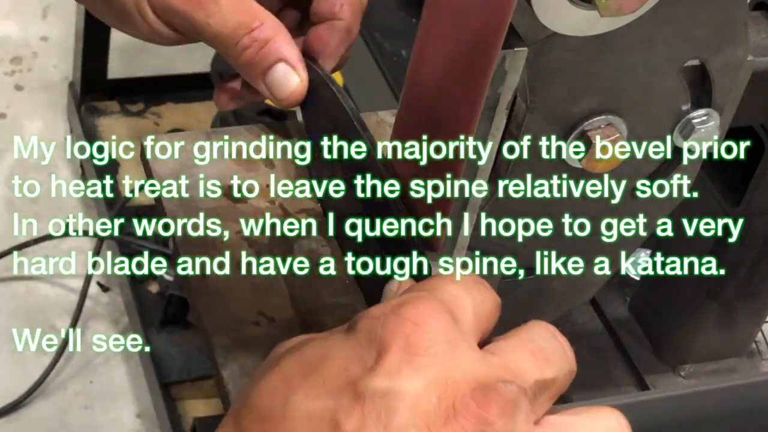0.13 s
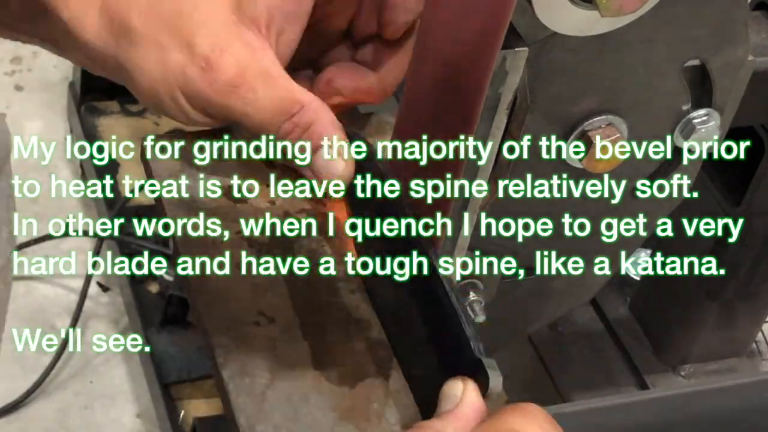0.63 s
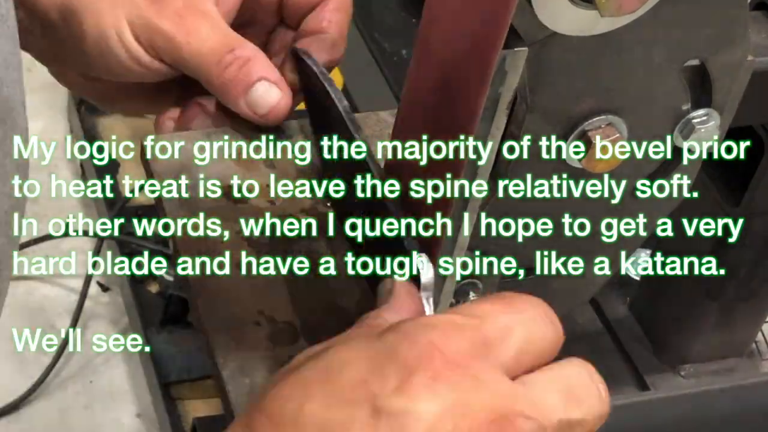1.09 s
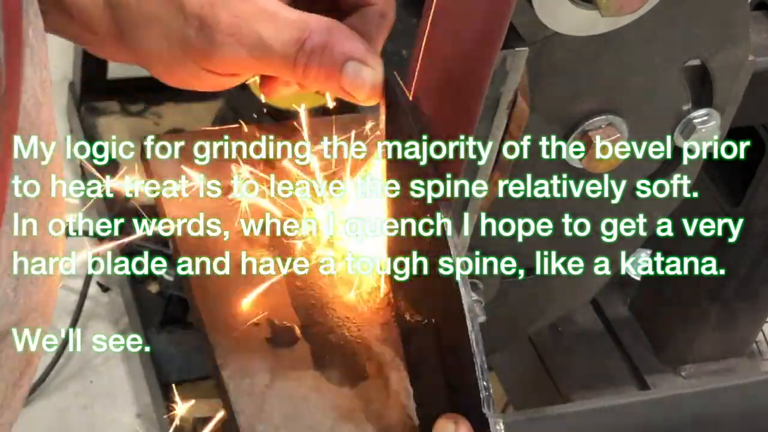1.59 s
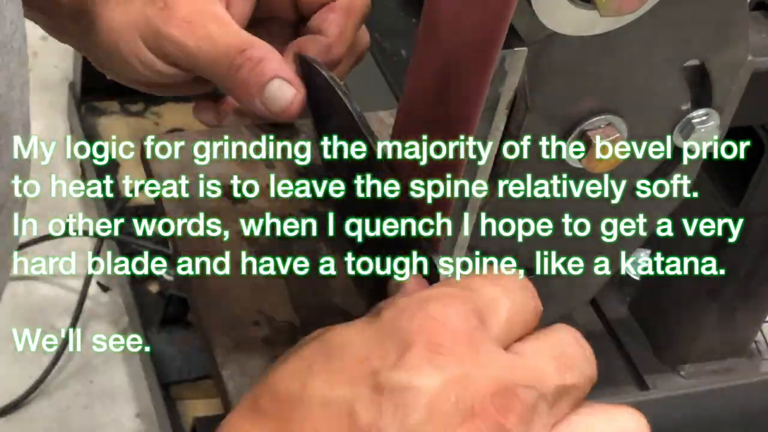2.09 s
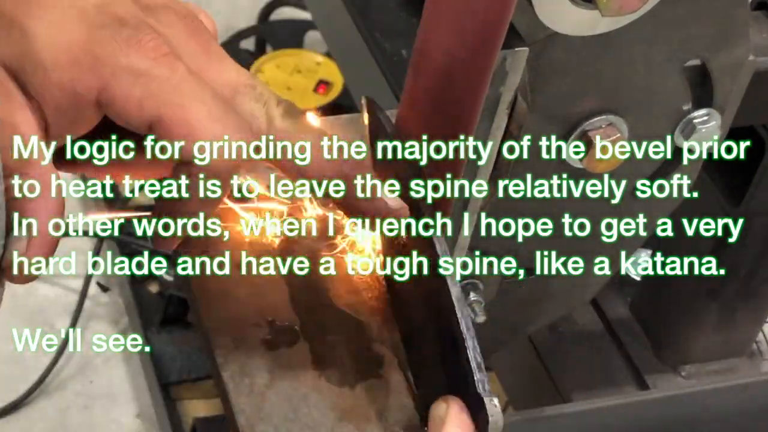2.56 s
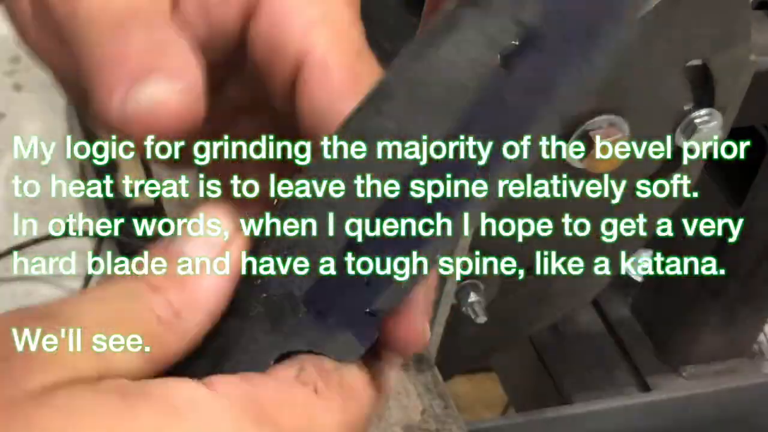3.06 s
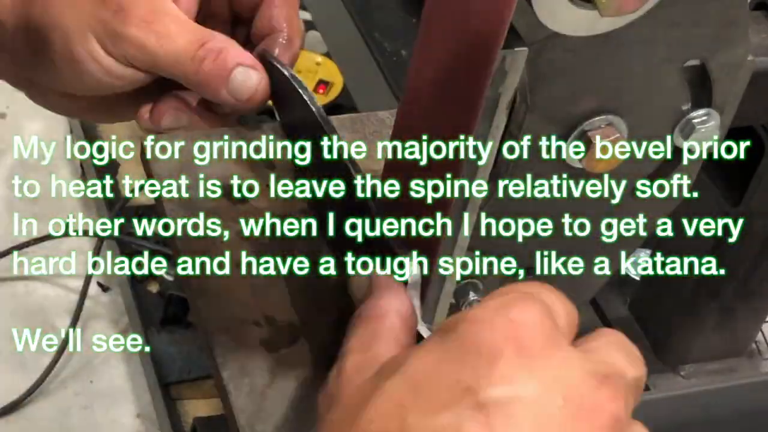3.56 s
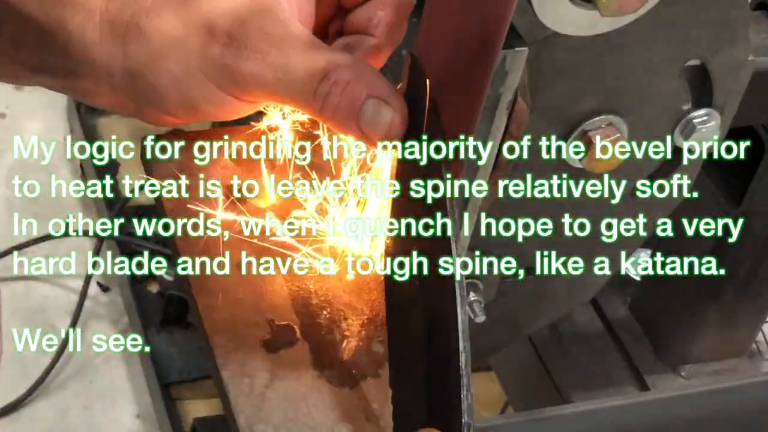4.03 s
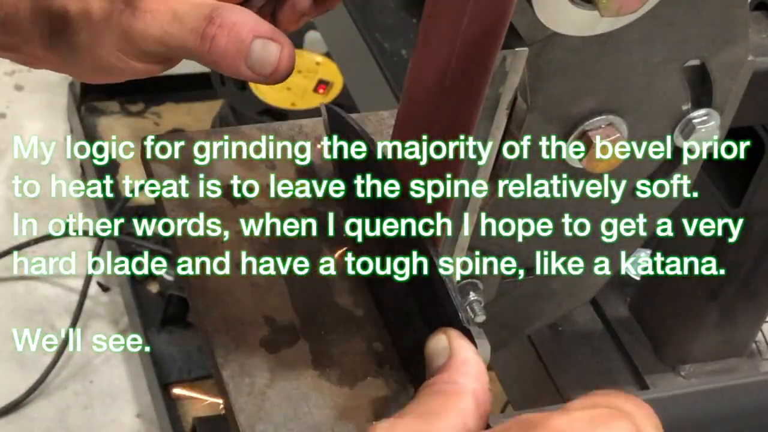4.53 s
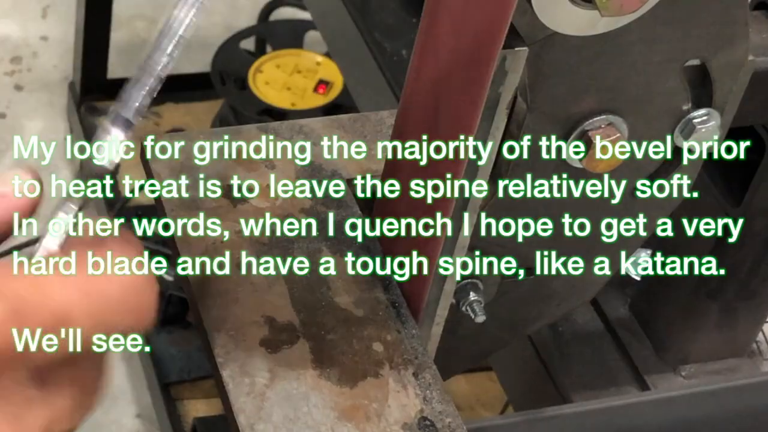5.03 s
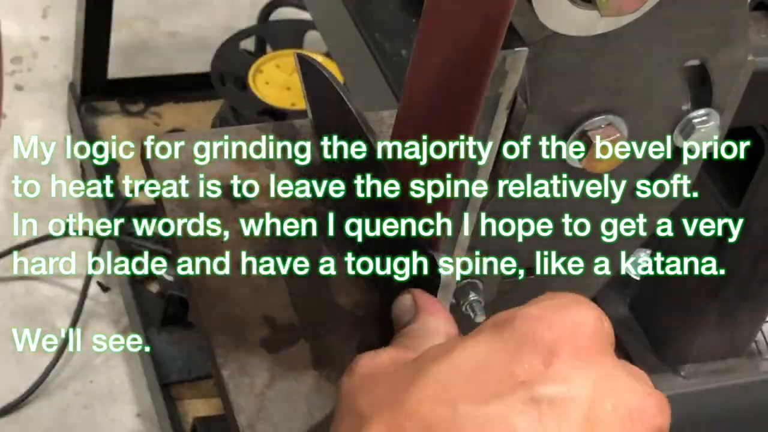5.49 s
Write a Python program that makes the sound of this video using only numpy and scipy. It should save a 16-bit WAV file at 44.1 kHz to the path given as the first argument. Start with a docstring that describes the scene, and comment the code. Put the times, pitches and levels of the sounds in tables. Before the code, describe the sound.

Close, mono-like sound of a blade being ground on a running belt machine. Continuous hissing, rattling belt noise through a ringing steel frame opens alone, then dense, sharp grit sizzle comes in repeated passes with pauses of bare machine between. Two passes near four seconds run straight into a third. Thin high squeaks appear at some stroke ends; motor rumble stays weak and the workshop echo is short.

```python
"""A belt grinder is heard first: wheels, bearings and belt hiss and rattle through a ringing steel frame,
over a motor rumble. Then a blade is drawn along the belt in short strokes. Grit is modelled as dense
contact noise, with a near reflection whose comb peaks slide as the blade moves; the blade rasps, rings as
a set of resonators and sometimes squeaks. The machine is heard less during strokes."""
import sys
import numpy as np
from scipy import signal
from scipy.fft import rfft, irfft
from scipy.io import wavfile
from scipy.ndimage import uniform_filter1d

SR = 44100
rng = np.random.default_rng(int(sys.argv[2]) if len(sys.argv) > 2 else 0)


def to_linear_factor(level_db):
    """Convert decibel levels (scalar or array-like) to linear amplitude factors."""
    exponent = np.asarray(level_db, float) / 20
    return 10 ** exponent


def dump_mix(stems):
    """Bounce the given channels to the path in sys.argv[1] as a 16-bit WAV at rate SR."""
    frames = np.atleast_2d(stems).T  # one column per channel
    limited = np.clip(frames, -1, 1)  # hard clip at full scale
    pcm = np.round(limited * 32767).astype(np.int16)
    wavfile.write(sys.argv[1], SR, pcm)


N = 248283  # length in samples

# course of each stroke, the second row being the bite:
# t/s, grit sizzle level/dB, grit body level/dB, blade level/dB, first reflection peak f/Hz
STROKES = [
    [(.25, -49, -69, -81, 6300), (.335, -43.5, -49, -81, 6400), (.5, -43.5, -48, -64, 6500),
     (.7, -42, -47.5, -65.5, 7140), (.8, -43.5, -47.5, -66, 7600), (.88, -42, -49.5, -70, 7600),
     (.925, -51, -56, -69, 7400)],
    [(1.25, -46, -49, -76, 6600), (1.29, -43.5, -49.5, -60, 6600), (1.5, -47.5, -49.5, -62, 6950),
     (1.57, -42.5, -49, -65.5, 6750), (1.66, -46.5, -51, -60, 6650), (1.78, -45, -50, -62.5, 7600)],
    [(2.175, -54, -54, -76, 6650), (2.23, -45.5, -54, -59.5, 6700), (2.29, -45, -62, -74, 6800),
     (2.4, -46, -53.5, -63.5, 7140), (2.55, -44, -51.5, -70, 7600), (2.62, -45, -49.5, -63.5, 7660),
     (2.7, -44, -60, -61, 7400), (2.835, -47, -57, -68, 7200)],
    [(3.75, -48.5, -56, -80, 6500), (3.79, -42.5, -45.5, -70, 6600), (3.85, -44.5, -50.5, -59.5, 6900),
     (3.9, -44, -47.5, -63.5, 7200)],
    [(3.905, -46, -51, -71, 4800), (3.95, -42, -49, -73.5, 5140), (4.03, -43, -50, -65.5, 4460),
     (4.1, -45, -49.5, -68.5, 3760), (4.16, -47, -51, -66, 4070), (4.3, -44.5, -51.5, -67, 4030),
     (4.38, -47, -51, -61, 3930)],
    [(4.395, -53, -61, -61, 7000), (4.46, -46, -52.5, -58.5, 7050), (4.55, -45, -51, -57, 7200),
     (4.66, -44, -49, -63.5, 7650), (4.72, -45.5, -48.5, -58.5, 7800), (4.785, -48, -52.5, -65.5, 7800)],
    [(5.505, -47, -50, -57, 7000), (5.535, -46.5, -52, -60, 7150), (5.63, -43, -47.5, -56.5, 7540)],
]
# one row a stroke: machine level change at the bite/dB, the same at the end/dB, ring over rasp level/dB,
# reflection amplitude/(0-1)
STROKE_KINDS = [(-7, -7.5, 2, 0.45), (-3.5, -6, 1, 0.23), (-1.5, -4.5, 1.5, 0.28), (-4, -7.5, 0, 0.45),
                (-9.5, -6, -2.5, 0.17), (-7, -7, -1, 0.4), (-8, -3, -5, 0.43)]
# noise spectrum of grit on steel: f/Hz, relative level per Hz/dB
GRIT_SPECTRUM = [(300, -21.5), (1120, -17), (2300, -5.5), (4500, 1), (7270, 7.5), (10500, 2), (13000, -1.5),
                 (16000, -1)]
# noise spectrum of the blade's rasp: f/Hz, relative level per Hz/dB
RASP_SPECTRUM = [(150, -29), (550, -10), (1000, -4), (1700, -3), (2600, -2), (3500, -10), (6000, -47)]
# modes of the blade: f/Hz, full width at -6 dB/Hz, relative level/dB
BLADE_MODES = [(630, 50, -12), (1330, 60, -9), (1680, 45, -4), (2080, 40, -4), (2500, 70, -1.5),
               (2620, 70, -3), (3340, 63, -3), (1592, 40, 0)]
# squeaks of the blade's tip: t/s, duration/s, f/Hz, level/dB
SQUEAKS = [(1.7, .025, 7850, -57), (1.746, .024, 7750, -48), (2.792, 0.016, 5750, -50),
           (2.81, 0.02, 5850, -50), (2.814, 0.035, 7800, -53), (4.208, 0.024, 4220, -64)]
# noise spectrum of belt and bearings: f/Hz, relative level per Hz/dB
BELT_SPECTRUM = [(500, -34), (820, -19), (1000, -17.5), (1900, -15), (2250, -11.5), (2700, -7),
                 (3180, -8.5), (3550, -3), (4400, -2), (5600, -5), (8200, -4.5), (10300, -10.5),
                 (12200, -14), (16000, -12.5)]
# resonances of the frame: f/Hz, width/Hz, level over the hiss around them/dB
FRAME_MODES = [(1448, 40, 5), (1503, 40, 5.5), (2787, 60, 3), (3320, 30, 6), (3655, 55, 5.5),
               (4000, 120, 1.5), (4269, 55, 3.5), (4544, 70, 3.5), (4926, 45, 3.5), (5185, 70, 2.5),
               (6290, 80, 2.5), (6970, 66, 2), (7988, 60, 2.5), (9400, 90, 2)]
# band in which the rattle throbs: f/Hz, level/dB
RATTLE_BAND = [(2200, -20), (3200, 0), (5500, 0), (9000, -8)]
# turning parts that make the rattle throb: turns per second/Hz, depth/(0-1)
WHEELS = [(37.6, .07), (80.7, .1), (173, .07), (224.6, .07), (254, .06), (316.5, .05)]
# noise spectrum of the motor: f/Hz, relative level per Hz/dB
MOTOR_SPECTRUM = [(25, -22), (90, -7.5), (175, -6), (300, 0), (420, 1.5), (620, 2.5), (750, -4),
                  (1200, -1.5)]
# peaks of the motor hum: f/Hz, width/Hz, level over the rumble around them/dB
MOTOR_HUM = [(115, 10, 9), (210, 14, 6), (227, 12, 10), (385, 40, 3), (545, 40, 3), (653, 18, 8)]
# brief changes of the whole level, mostly dips: middle t/s, level/dB
DIPS = [(.945, -4.5), (1.795, -2), (2.71, -1.5), (2.85, -3), (4.39, -2.5), (4.8, -1.5), (5.53, 1)]


def grinding():
    """Friction excitation: grit hisses on the steel, and the same contact rasps and rings the blade."""
    contact, sizzle_db, body_db, rasp_db, ring_db, peak_hz, reflection = stroke_controls()
    # the hand is never quite steady
    unsteady_db = 0.6 * flutter(size=900) + 0.5 * flutter(size=120)
    pressure = contact * to_linear_factor(unsteady_db)
    hiss = reflected(grit(), sizzle_db, body_db, peak_hz, reflection)
    hiss = patchy(hiss, patchy_db=1.46)
    return pressure * (hiss + to_linear_factor(rasp_db) * blade_rasp() + to_linear_factor(ring_db) * blade_ring())


def stroke_controls():
    """Piecewise-linear motion: joins strokes into curves; contact is near 1 while the blade touches."""
    t = np.arange(N) / SR
    rows = np.concatenate(STROKES)
    starts = [stroke[0][0] for stroke in STROKES]
    which = np.clip(np.searchsorted(starts, t) - 1, 0, None)
    touching = [(t >= stroke[0][0]) & (t <= stroke[-1][0] + 0.005) for stroke in STROKES]
    contact = sum(touching).clip(0, 1).astype(float)
    contact = uniform_filter1d(contact, size=500)  # softens each edge over 11 ms
    sizzle_db, body_db, rasp_db, peak_hz = (np.interp(t, rows[:, 0], column) for column in rows[:, 1:].T)
    ring_over_rasp_db, reflection = np.array(STROKE_KINDS)[which, 2:].T
    return contact, sizzle_db, body_db, rasp_db, rasp_db + ring_over_rasp_db, peak_hz, reflection


def grit():
    """Many-contact friction: noise of unequal impulses with the spectrum of grit on steel."""
    return level_in(colour(scratches(spread_db=2.1), GRIT_SPECTRUM), 10330, 18200)


def reflected(x, sizzle_db, body_db, peak_hz, strength):
    """Comb interference: direct sound plus a copy delayed by one period of the first peak."""
    split_hz, blend_hz = 10220, 800  # the grit's body lies below the split, its sizzle above
    hz, t, z = signal.stft(x, SR, nperseg=256, noverlap=192)
    hz = hz[:, None]
    at = np.minimum((t * SR).astype(int), N - 1)
    delay_in_waves = hz / peak_hz[at]
    share = np.clip(strength[at], 0, 0.95)
    comb = (1 + share * np.exp(-2j * np.pi * delay_in_waves)) / np.sqrt(1 + share ** 2)
    above = 1 / (1 + np.exp((split_hz - hz) / blend_hz))
    level_db = above * sizzle_db[at] + (1 - above) * body_db[at]
    return signal.istft(z * comb * to_linear_factor(level_db), nperseg=256, noverlap=192)[1][:N]


def blade_rasp():
    """Broadband friction response: scraping noise takes on the spectrum of the blade."""
    return level_in(colour(scratches(spread_db=1.6), RASP_SPECTRUM), 600, 1450)


def blade_ring():
    """Modal resonance: steady noise excites the narrow modes of the blade."""
    hz = np.fft.rfftfreq(N, 1 / SR)
    power = sum(to_linear_factor(db) ** 2 / (1 + (2 * (hz - mode_hz) / width) ** 2) ** 2
                for mode_hz, width, db in BLADE_MODES)
    ring = irfft(rfft(rng.standard_normal(N)) * np.sqrt(power), N)
    return level_in(ring, 1530, 1720)


def squeaks():
    """Tonal friction: short whistles at fixed pitch, amplitude-modulated by fast noise."""
    t, out = np.arange(N) / SR, np.zeros(N)
    rough = 1 + 0.16 * flutter(size=70)
    for start, length, hz, db in SQUEAKS:
        swell = np.sin(np.pi * np.clip((t - start) / length, 0, 1))
        # the factor 2 makes the level the rms over the squeak
        out += to_linear_factor(db) * 2 * swell * np.sin(2 * np.pi * hz * t)
    return out * rough


def machine():
    """Superposition: belt noise and motor rumble add, both heard less during each stroke."""
    duck_db = machine_duck_db()
    return belt(duck_db) + motor(duck_db)


def machine_duck_db():
    """Ducking: the machine is heard less from the bite, jumps part way back at the end, relaxes to 0 dB."""
    fall_s, after_db, return_s = 0.046, -3.5, 0.43  # fall time, level after a stroke, time constant
    t, duck_db = np.arange(N) / SR, np.zeros(N)
    for stroke, (first_db, last_db, *_) in zip(STROKES, STROKE_KINDS):
        start, bite, end = stroke[0][0], stroke[1][0], stroke[-1][0]
        before_db = duck_db[round(start * SR) - SR // 100]  # 10 ms ahead of the stroke
        during_db = np.interp(t, [bite - fall_s, bite, end], [before_db, first_db, last_db])
        recovery_db = after_db * np.exp(-np.maximum(t - end, 0) / return_s)
        duck_db = np.where(t < start, duck_db, np.where(t < end, during_db, recovery_db))
    return uniform_filter1d(duck_db, size=900)


def belt(duck_db):
    """Source and filter: belt and bearing noise, modulated by the wheels, rings through the frame."""
    between_strokes_db = -44  # level where duck_db is 0
    t = np.arange(N) / SR
    throb = sum(depth * np.cos(2 * np.pi * (turns * t + rng.random())) for turns, depth in WHEELS)
    drive = scratches(spread_db=1.55) * to_linear_factor(0.5 * flutter(size=150))
    drive = drive + colour(throb * drive, RATTLE_BAND)
    noise = workshop(colour(drive, BELT_SPECTRUM, FRAME_MODES), echo_db=-12)
    noise = level_in(patchy(noise, patchy_db=0.82), 3520, 4960)
    return noise * to_linear_factor(between_strokes_db + duck_db + 0.49 * flutter(size=1200))


def workshop(x, echo_db):
    """Reverberation: walls and benches add a short dense tail that ripples the spectrum."""
    t = np.arange(4000) / SR
    decay = to_linear_factor(-60 * t / 0.21)  # 60 dB in 0.21 s
    tail = rng.standard_normal(len(t)) * decay * (t > 0.002)
    return x + to_linear_factor(echo_db) * signal.oaconvolve(x, tail / np.linalg.norm(tail))[:N]


def motor(duck_db):
    """Resonant noise: a low rumble with hum peaks, ducked rather more than the belt."""
    between_strokes_db = -63.5  # level where duck_db is 0
    duck_ratio = 1.17  # dB the motor falls for each dB that the belt falls
    rumble = colour(rng.standard_normal(N), MOTOR_SPECTRUM, MOTOR_HUM)
    rumble = level_in(rumble, 90, 700)
    return rumble * to_linear_factor(between_strokes_db + duck_ratio * duck_db + 1.7 * flutter(size=2000))


def scratches(spread_db):
    """Random impulse trains: dense noise in which each contact has its own size; a few are large."""
    return rng.standard_normal(N) * to_linear_factor(spread_db * np.minimum(rng.exponential(1, N), 5))


def patchy(x, patchy_db):
    """Time-frequency modulation: random louder and softer patches, some 700 Hz by 50 ms."""
    z = signal.stft(x, nperseg=512, noverlap=384)[2]
    field = rng.standard_normal(z.shape[::-1]).T
    field = uniform_filter1d(field, size=8, axis=0)
    field = evened(uniform_filter1d(field, size=16, axis=1))
    return signal.istft(z * to_linear_factor(patchy_db * field), nperseg=512, noverlap=384)[1][:N]


def flutter(size):
    """Low-pass noise: slow chance of rms 1, smoothed twice over size samples."""
    noise = uniform_filter1d(rng.standard_normal(N), size)
    return evened(uniform_filter1d(noise, size))


def colour(x, points, modes=()):
    """Linear filtering: a broad spectrum with resonant peaks on top."""
    hz = np.fft.rfftfreq(len(x), 1 / SR)
    f, db = np.transpose(points)
    power = to_linear_factor(np.interp(np.log(hz + 1), np.log(f + 1), db)) ** 2
    peaks = sum((to_linear_factor(top_db) ** 2 - 1) / (1 + (2 * (hz - mode_hz) / width) ** 2)
                for mode_hz, width, top_db in modes)
    return irfft(rfft(x) * np.sqrt(power * np.maximum(1 + peaks, 0.01)), len(x))


def level_in(x, low_hz, high_hz):
    """Band level: scales so that the given band has rms 1."""
    hz = np.fft.rfftfreq(len(x), 1 / SR)
    band = irfft(rfft(x) * ((hz > low_hz) & (hz < high_hz)), len(x))
    return x / np.sqrt(np.mean(band ** 2))


def evened(x):
    """Mean power: scales to rms 1."""
    return x / np.sqrt(np.mean(x ** 2) + 1e-20)


def scene():
    """Superposition: all sources add, share brief level changes and reach both channels alike."""
    t = np.arange(N) / SR
    width_s = 0.071  # whole width of each level change
    dip_db = sum(db * np.cos(np.pi * np.clip((t - middle) / width_s, -0.5, 0.5)) ** 2
                 for middle, db in DIPS)
    mix = grinding() + squeaks() + machine()
    return np.tile(mix * to_linear_factor(dip_db), (2, 1))


def band_limit(x):
    """A steep low-pass at the top of the band."""
    return signal.sosfilt(signal.butter(12, 17040, fs=SR, output="sos"), x)


def record(dry):
    """Band limitation: a steep linear-phase low-pass removes the highest treble."""
    edge = signal.firwin(1023, 15730, window=("kaiser", 11), fs=SR)  # edge in Hz
    mix = signal.oaconvolve(dry, edge[None], "same", axes=1)
    return band_limit(mix)


dry = scene()
out = record(dry)
dump_mix(out)
```